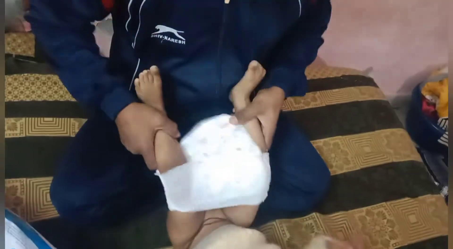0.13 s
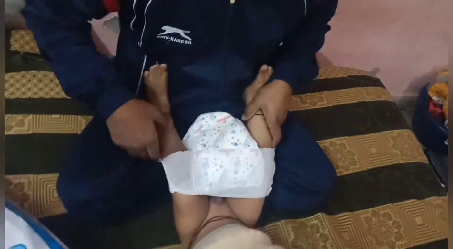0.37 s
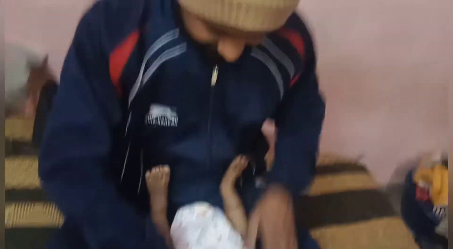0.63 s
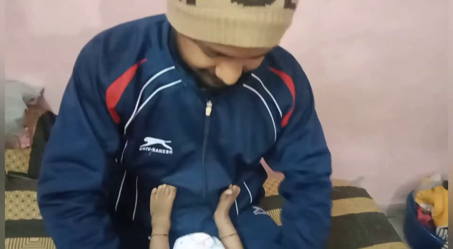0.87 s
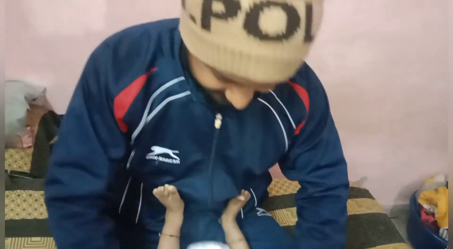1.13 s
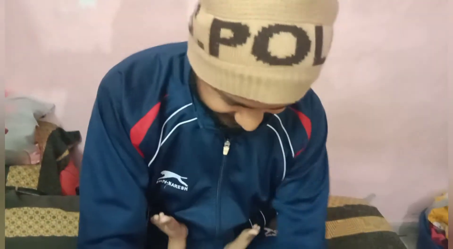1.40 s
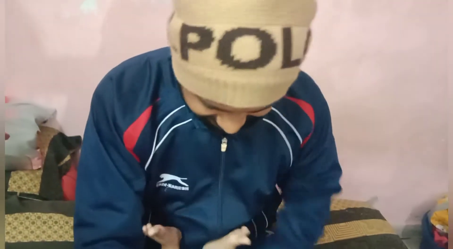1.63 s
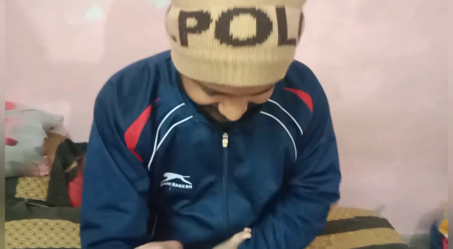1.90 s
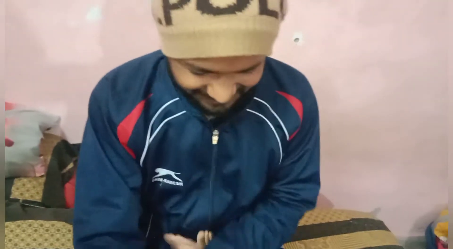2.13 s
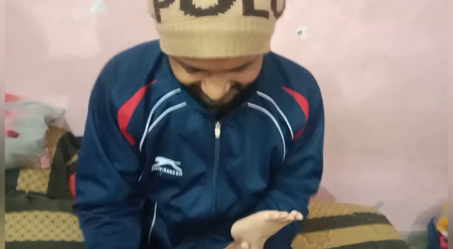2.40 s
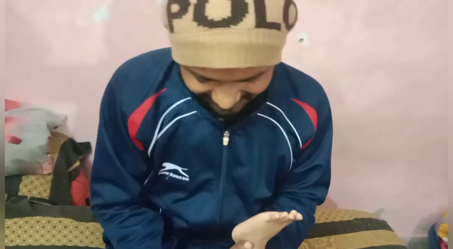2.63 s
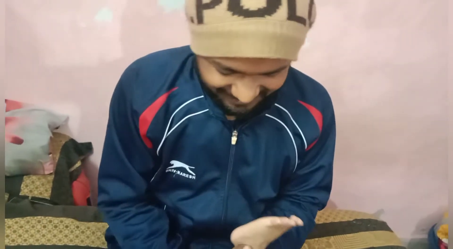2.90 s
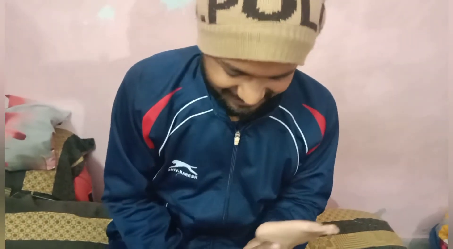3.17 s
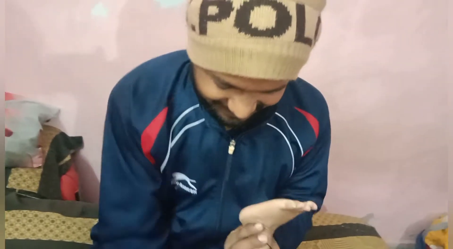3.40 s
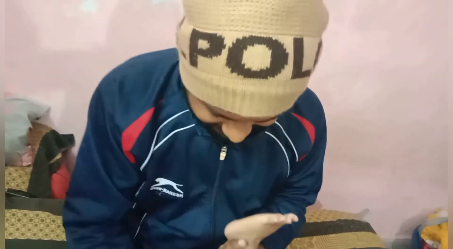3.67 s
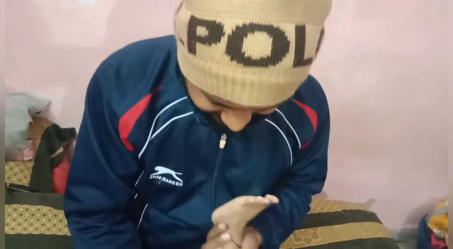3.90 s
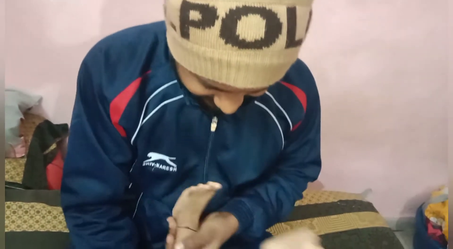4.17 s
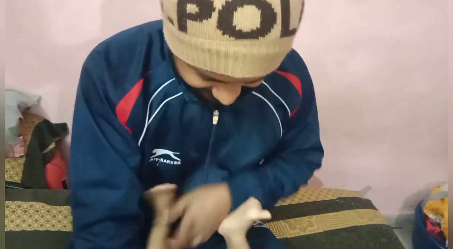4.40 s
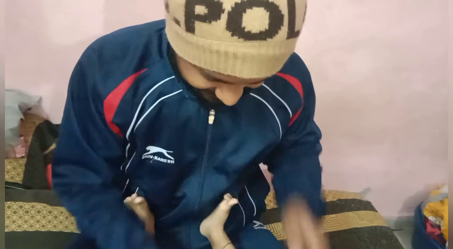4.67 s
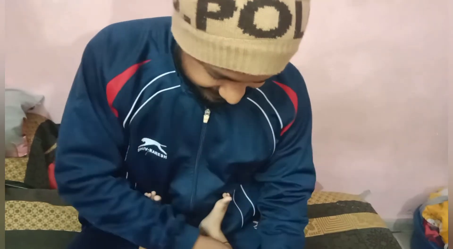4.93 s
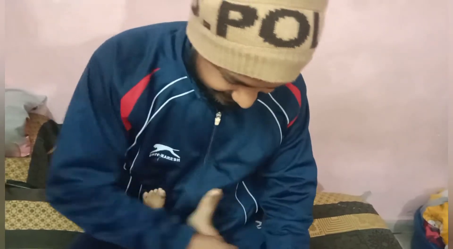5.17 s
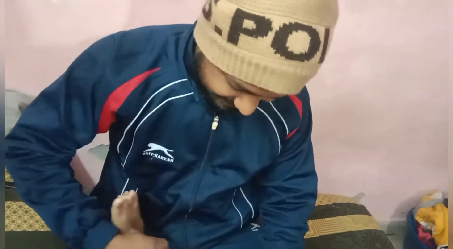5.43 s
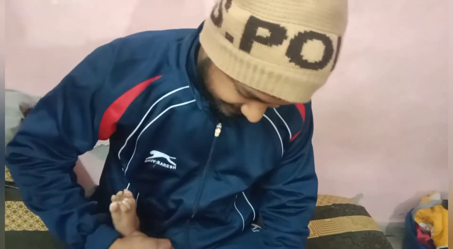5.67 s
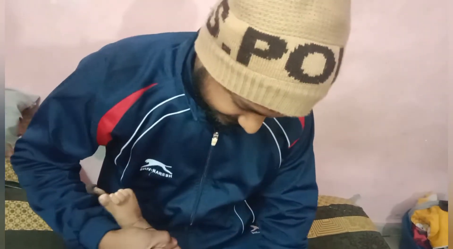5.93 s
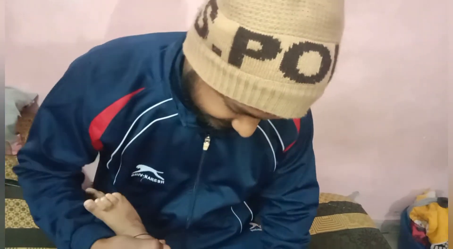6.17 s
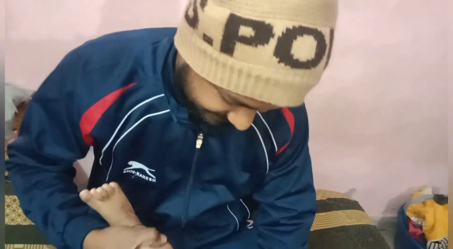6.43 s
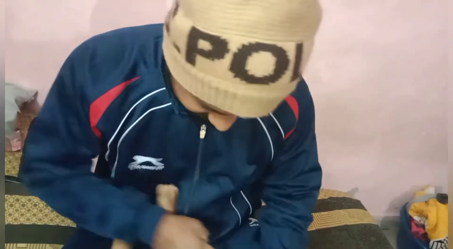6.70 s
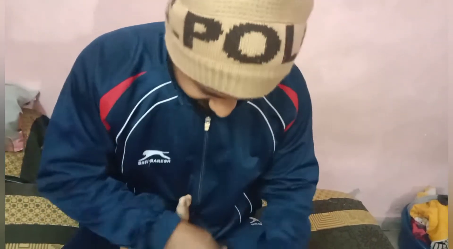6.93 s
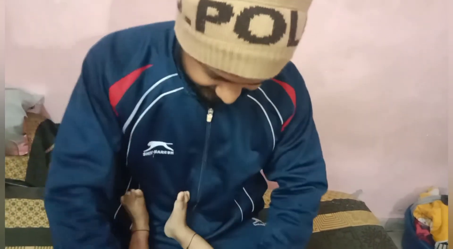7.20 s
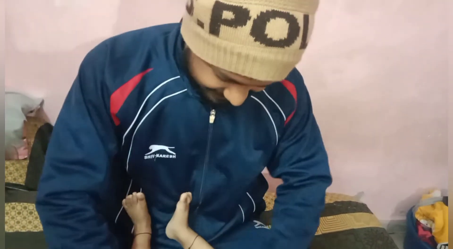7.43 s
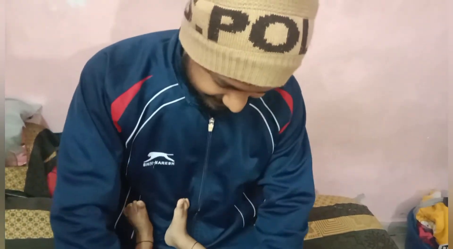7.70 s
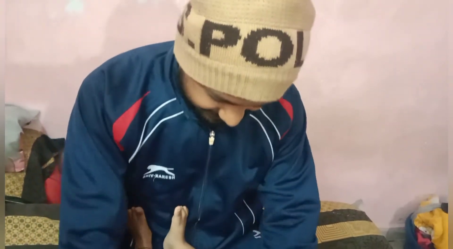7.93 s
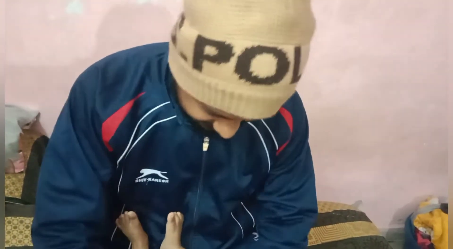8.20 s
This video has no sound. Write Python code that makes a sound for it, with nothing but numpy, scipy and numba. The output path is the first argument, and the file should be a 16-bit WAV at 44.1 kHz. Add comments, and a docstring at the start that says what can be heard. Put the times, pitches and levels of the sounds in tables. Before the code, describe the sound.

A small close microphone in a quiet room hears a disposable diaper being worked over a baby's legs on a bed. At 0 s there is a soft low bump with a very short scrape, then light crinkles. From about 0.47 to 0.9 s comes the biggest tug, a bright fibrous hiss with plastic crackle and muffled padding underneath. Sharp creases click near 1 s. Smaller rustles follow, with a crisp rub around 1.75 s and a longer one from 2.05 to 2.45 s, ending with a snap and dull bump. Clustered snaps come at 3.26 s and the sharpest at 3.45 s. Soft mattress nudges occur near 3.85 and 6.5 s. From 4 s onward only sparse, faint crinkles and ticks remain, slightly busier around 5.8 and 7.2 to 7.7 s, fading into low room hush by 8.3 s.

```python
"""Disposable diaper pulled on over a bed

A disposable diaper is pulled over a baby's legs on a bed, close to a small microphone in a quiet room.
Trains of tiny stick-slip clicks, shaped by tugs, make the fibres hiss and the plastic backsheet crinkle;
through moving resonances they make the padded core and the bedding rustle lower down. Creases snap as
bursts of clicks, hands and heels bump the mattress as damped low swings, and a short echo and a hush
of coloured noise make the room."""
import sys
import numpy as np
from scipy import signal
from scipy.fft import rfft, irfft
from scipy.io import wavfile
from scipy.ndimage import uniform_filter1d
from numba import njit

SR = 44100
rng = np.random.default_rng(int(sys.argv[2]) if len(sys.argv) > 2 else 0)


def wrap_up_sound(samples):
    """Save the sound to the file named by the first command line argument, as 16-bit audio."""
    columns = np.atleast_2d(samples).T
    # keep every value between -1 and 1, then stretch to whole-number steps
    tamed = np.clip(columns, -1, 1)
    steps = np.round(tamed * 32767).astype(np.int16)
    wavfile.write(sys.argv[1], SR, steps)


def gain_from_db(level_db):
    """Convert decibel levels to linear amplitude factors (20 dB per decade)."""
    decades = np.asarray(level_db, float) / 20
    return 10 ** decades


N = 367119

# Creases that snap: t/s, relative level/dB, share of the power given to the backsheet (0-1)
CREASE_SNAPS = [(0.1358, -29.5, 0.95), (0.147, -33, 0.95), (0.204, -26, 0.55), (0.317, -34.5, 0.9),
                (0.468, -27, 0.6), (0.934, -25, 0), (0.948, -28, 0.2), (0.9842, -21, 0.1),
                (0.998, -27, 0.05), (1.7277, -27, 0.04), (2.3556, -20.5, 0.7), (2.437, -35, 0.3),
                (3.16, -27, 0), (3.2582, -21, 0.8), (3.2627, -21.5, 0.6), (3.281, -22, 0.26),
                (3.4502, -18, 0.4), (4.5933, -32, 0.1), (4.62, -33, 0.4), (5.815, -29.5, 0.24),
                (5.883, -35, 0.8), (6.0599, -32.5, 0.1), (6.166, -37, 0.07), (6.418, -28.5, 0.2),
                (6.5376, -35, 0.7), (6.877, -30.5, 0.7), (6.9585, -36, 0.36), (7.181, -30, 0.75),
                (7.349, -29, 0.9), (7.4834, -32, 0.3), (7.6239, -29.5, 0.6), (7.647, -31, 0.6),
                (7.6666, -29, 0.1), (7.9614, -34, 0.04)]
# Bumps on the mattress: t/s, relative level/dB, f/Hz, time to fall 60 dB/s
MATTRESS_BUMPS = [(0.0, -29.5, 168, 0.075), (0.004, -49, 45, 0.25), (0.019, -33, 141, 0.11),
                  (2.355, -44, 310, 0.061), (2.375, -45, 307, 0.075), (2.435, -30, 87, 0.041),
                  (3.45, -56, 357, 0.069), (3.47, -57, 85, 0.12), (3.491, -39, 161, 0.059),
                  (3.841, -51, 118, 0.068), (3.85, -61, 85, 0.1), (3.856, -41.5, 167, 0.073),
                  (3.954, -46.5, 180, 0.075), (6.475, -52, 393, 0.089), (6.535, -41.5, 302, 0.039),
                  (6.557, -47.5, 171, 0.061), (6.56, -60, 85, 0.12)]
# Tugs and slides of the sheet: start t/s, length/s, hiss level at start/dB, hiss level at end/dB,
# finest fibres re hiss/dB, backsheet re hiss/dB
SHEET_TUGS = [(0.0, 0.025, -31.5, -45.5, -19, -5.5), (0.028, 0.086, -56.5, -52.5, -15, -4),
              (0.139, 0.065, -55, -45, -10.5, -11), (0.225, .05, -54, -56, -12, -9),
              (0.318, 0.057, -54, -57.5, -15, -7), (0.471, 0.061, -41.5, -31, -2, -2.5),
              (0.55, .17, -32, -35.5, -1.5, -2), (0.736, 0.15, -41, -45.5, 1, -0.3),
              (0.911, .16, -44.5, -46.5, -5.5, -5), (1.086, 0.055, -53.5, -58.5, -6, -8),
              (1.179, 0.044, -55, -55, -7, -11), (1.216, 0.15, -45.5, -48.5, -7.5, -7.5),
              (1.383, 0.076, -58, -59, -11, -11), (1.53, 0.12, -56, -59.5, -6, -10.5),
              (1.743, 0.038, -37.5, -37, -4, -12), (1.805, 0.069, -45, -37, -4.5, -9.5),
              (1.945, 0.072, -59, -51, -21, -5), (2.01, 0.025, -57, -52, -9, -1.5),
              (2.052, .24, -46, -45, -5, -4.5), (2.302, 0.074, -45.5, -41, -5, -5),
              (2.413, .12, -44, -51.5, -8.5, -5), (2.595, 0.059, -54.5, -54, -11, -6.5),
              (2.803, 0.076, -62, -64, -11, -18), (2.956, 0.051, -54, -61, -18, -11),
              (3.028, 0.095, -61, -52.5, -9, -9), (3.145, 0.086, -50, -49, -6, -5),
              (3.256, 0.083, -42.5, -51.5, -3.5, -4.5), (3.381, 0.061, -50.5, -37, -7.5, -2),
              (3.532, 0.16, -55.5, -52, -6.5, -5), (3.727, 0.14, -55, -61.5, -7.5, -6),
              (3.856, 0.13, -58, -53, -5, -7), (3.972, 0.23, -56.5, -58, -5.5, -8.5),
              (4.217, 0.25, -58.5, -47, -7.5, -7), (4.485, 0.064, -53, -56, -12, -9),
              (4.571, 0.054, -60.5, -55, -8, -6), (4.843, 0.074, -54, -61, -10, -9.5),
              (4.957, .09, -56, -61, -13, -9), (5.056, 0.033, -56.5, -48, -6, -5.5),
              (5.196, 0.058, -66, -55, -9, -3.5), (5.29, .2, -52, -60.5, -5.5, -7.5),
              (5.717, .05, -65.5, -61, -8, -11), (5.788, 0.058, -55, -46, -3, -9),
              (5.868, 0.12, -48, -60.5, -7, -6.5), (6.021, 0.096, -54, -62.5, -6.5, -7.5),
              (6.153, .03, -55, -58.5, -9, -13), (6.198, 0.11, -61.5, -53, -6, -6),
              (6.341, 0.092, -59.5, -47.5, -7, -7.5), (6.448, 0.064, -51.5, -57, -5, -8),
              (6.534, 0.048, -51.5, -55, -6, -5.5), (6.752, 0.13, -58, -51, -7, -6),
              (6.959, 0.02, -59, -61, -16, -7), (7.154, 0.012, -62, -51.5, -1.5, -3),
              (7.185, .03, -55, -59, -6, -4), (7.256, 0.22, -50.5, -52.5, -4, -6),
              (7.499, .08, -54.5, -59.5, -5, -5.5), (7.602, 0.078, -54, -47.5, -4, -7),
              (7.963, 0.027, -59, -61.5, -11, -10), (8.096, .15, -76.5, -66.5, -1.5, -10.5),
              (8.304, .05, -63.5, -56, -3, -4)]
# Squeezes of the padded core, a hollow whose size changes: start t/s, length/s, level/dB, hollow f/Hz
CORE_SQUEEZES = [(0.0, .03, -47, 1240), (0.16, .01, -56, 1540), (0.21, 0.0085, -59, 1327),
                 (0.32, 0.004, -58, 1400), (0.51, .22, -45, 1370), (0.78, 0.19, -55, 1230),
                 (0.95, 0.085, -50.5, 1155), (1.25, .11, -58, 1190), (1.74, .06, -61, 1250),
                 (1.85, 0.084, -68, 1170), (2.08, 0.076, -54.5, 1370), (2.2, 0.14, -60, 1450),
                 (2.36, 0.038, -55.5, 1280), (2.44, 0.18, -66.5, 1400), (2.97, 0.0068, -63, 1360),
                 (3.2, 0.022, -59, 1000), (3.26, 0.033, -53, 1130), (3.4, 0.071, -54.5, 1350),
                 (3.66, 0.011, -61, 972), (3.84, 0.0082, -62.5, 1220), (3.98, 0.0073, -64, 1110),
                 (4.17, .01, -66.5, 1440), (4.35, 0.024, -67, 1290), (4.47, 0.013, -72, 1190),
                 (4.96, 0.012, -60, 1314), (5.08, 0.0077, -63.5, 1100), (5.86, 0.067, -59, 1230),
                 (6.44, 0.0064, -64, 1360), (6.56, 0.0053, -64, 1160), (6.82, .08, -67, 1205),
                 (6.96, 0.029, -65, 1320), (7.18, 0.0091, -61, 1060), (7.28, 0.039, -61, 1160),
                 (7.37, 0.13, -61, 1230), (7.67, 0.015, -63, 1180), (7.97, 0.011, -70.5, 1240)]
# The body shifts on the bedding: start t/s, length/s, level/dB, strongest f/Hz
BED_SHIFTS = [(0.0, 0.01, -39.5, 167), (0.06, .07, -58.5, 160), (0.16, 0.04, -63.5, 347),
              (0.51, 0.18, -46.5, 413), (0.7, 0.14, -52.5, 313), (0.86, 0.12, -55.5, 290),
              (1.0, 0.0047, -51.5, 362), (1.04, 0.051, -60, 348), (1.27, 0.0081, -62.5, 159),
              (1.37, 0.016, -69, 388), (1.55, 0.0092, -71, 164), (1.78, 0.0033, -69, 397),
              (2.15, 0.0092, -63.5, 323), (2.22, 0.078, -58.5, 610), (2.36, 0.016, -52, 277),
              (2.43, 0.021, -55.5, 143), (2.5, 0.013, -67, 413), (3.28, 0.017, -69, 410),
              (3.45, 0.017, -50, 360), (3.5, 0.016, -63.5, 276), (3.57, .04, -71, 150),
              (3.66, 0.088, -72, 430), (3.84, 0.024, -55, 176), (3.98, 0.0061, -63, 163),
              (4.96, 0.094, -73, 330), (5.4, 0.0073, -67, 317), (5.86, .01, -70, 384),
              (6.02, 0.0087, -64.5, 402), (6.14, .01, -71, 545), (6.3, 0.008, -69.5, 517),
              (6.49, .02, -68.5, 410), (6.58, 0.005, -69.5, 212), (6.84, .01, -73, 159),
              (7.02, .01, -74, 306), (7.3, .1, -64.5, 408), (7.67, 0.0066, -71, 337), (8.0, .01, -71, 316),
              (8.2, .1, -76, 290)]

# Colour of the sliding fibres through the small microphone port: f/Hz, relative level per Hz/dB
FIBRE_COLOUR = [(3500, -38), (4250, -13.5), (4650, -2.5), (5200, 0.5), (5700, 1.5), (6500, -2), (7200, -15),
                (8200, -31), (10300, -34.5), (11500, -56.5)]
# Colour of the finest fibres, the top of the hiss: f/Hz, relative level per Hz/dB
FINEST_COLOUR = [(7000, -51), (8300, -31), (10500, -18.5), (12000, -19.5), (13300, -15.5), (13900, -10.5),
                 (14300, -9.5), (14800, 7.5), (15300, 3), (15750, 3.5), (17000, -10.5)]
# Colour of the tight plastic backsheet: f/Hz, relative level per Hz/dB
BACKSHEET_COLOUR = [(1800, -35.5), (2600, -7.5), (2900, 1), (3250, 3), (3800, -0.5), (4300, -5.5),
                    (5000, -39.5)]
# Colour of the slack, lower-sounding backsheet: f/Hz, relative level per Hz/dB
SLACK_COLOUR = [(1200, -26.5), (1650, -9), (1950, -3.5), (2250, -1.5), (2600, 1.5), (3000, -11.5),
                (4000, -43.5)]
# Colour of the padded core: f/Hz, relative level per Hz/dB
CORE_COLOUR = [(600, -34), (800, -9.5), (950, 4), (1250, -5.5), (1500, 1.5), (1900, 0.5), (3000, -58.5)]
# Colour of the bedding: f/Hz, relative level per Hz/dB
BEDDING_COLOUR = [(40, -50), (70, -10), (130, 1), (300, 1), (450, -2), (700, -3.5), (1000, 13.5),
                  (2000, -71)]
# Colour of the quiet room: f/Hz, relative level per Hz/dB
HUSH_COLOUR = [(20, -20), (60, -3.5), (150, 0), (330, -5), (550, -14.5), (900, -13), (1400, -9),
               (2100, -14.5), (3300, -26), (4200, -35), (5000, -8), (6200, 0), (7400, -27), (11500, -44),
               (13800, -50), (14800, -16), (16000, -26)]

# How fast strokes swell and fade, and the level between them
TUG_RISE_DB_PER_S, TUG_FALL_DB_PER_S, TUG_REST_DB = 620, 255.5, -75.5
SQUEEZE_RISE_DB_PER_S, SQUEEZE_FALL_DB_PER_S, CORE_REST_DB = 498.5, 266, -85
SHIFT_RISE_DB_PER_S, SHIFT_FALL_DB_PER_S, BED_REST_DB = 598, 242, -80.5
CORE_FOLLOWS_DB, BED_FOLLOWS_DB = -21, -31  # every tug also stirs core and bedding, re hiss
HUSH_DB, ECHO_DB, ECHO_T60_S = -73.5, -15, 0.16  # the echo level is relative to the near sound
DIP_S, DIP_END_S, DIP_DB = 7.08, 7.157, -7


def rms_one(x):
    """Scale to unit rms."""
    return x / np.sqrt(np.mean(x ** 2) + 1e-20)


def coloured(x, spectrum, size=4096):
    """Causal filter with the given spectrum (minimum phase, from the folded cepstrum), unit energy."""
    hz, db = np.transpose(spectrum)
    grid = np.maximum(np.arange(size // 2 + 1), 1) * SR / size
    cepstrum = irfft(np.log(gain_from_db(np.interp(np.log(grid), np.log(hz), db))))
    cepstrum[1:size // 2] *= 2
    cepstrum[size // 2 + 1:] = 0
    response = irfft(np.exp(rfft(cepstrum)))
    return signal.fftconvolve(x, response / np.sqrt(np.sum(response ** 2)))[:N]


def drift(rate):
    """Slow random wander of unit rms, changing about rate times a second."""
    r = np.exp(-2 * np.pi * rate / SR)
    noise = rng.standard_normal(N + SR)
    settled = signal.lfilter([1], [1, -2 * r, r * r], noise)[SR:]
    return rms_one(settled)


def patchy(x, patch_db, patch_hz, patch_s, even_db=-58.0):
    """Slow random gain over time and pitch; the patches even out as a frame grows louder than even_db."""
    hz, s, frames = signal.stft(x, SR, nperseg=1024, noverlap=768)
    field = rng.standard_normal(frames.shape)
    for _ in range(2):
        field = uniform_filter1d(field, size=max(1, round(patch_hz / hz[1])), axis=0)
        field = uniform_filter1d(field, size=max(1, round(patch_s / s[1])), axis=1)
    loud = np.sqrt(np.sum(np.abs(frames) ** 2, axis=0))
    gain = gain_from_db(patch_db * rms_one(field) / np.sqrt(1 + loud / gain_from_db(even_db)))
    gain /= np.sqrt(np.mean(gain ** 2, axis=0))
    return signal.istft(frames * gain, SR, nperseg=1024, noverlap=768)[1][:N]


def stick_slip(clump_db):
    """Tiny releases of rubbing material: random clicks of uneven size, clumped by clump_db; rms 1."""
    sizes = gain_from_db(2.5 * np.minimum(rng.exponential(1, N), 5)) * rng.choice([-1, 1], N)
    born = rng.random(N) < 5000.0 / SR  # about 5000 slips a second
    return rms_one(sizes * born * gain_from_db(clump_db * drift(45.0)))


def slips(shared, share):
    """Part of the slips is common to all layers, the rest belongs to one layer."""
    own = stick_slip(clump_db=0.83)
    return np.sqrt(share) * shared + np.sqrt(1 - share) * own


def strokes(start, length, first_db, last_db, rise, fall, rest_db):
    """Level in dB of overlapping strokes: each rises, drifts from first_db to last_db, falls; powers add."""
    t = np.arange(0, N + 32, 32) / SR
    since, length = t - start[:, None], length[:, None]
    held = first_db[:, None] + (last_db - first_db)[:, None] * np.clip(since / length, 0, 1)
    db = held + rise * np.minimum(since, 0) - fall * np.maximum(since - length, 0)
    power = np.sum(gain_from_db(2 * db), axis=0) + gain_from_db(2 * rest_db)
    return np.interp(np.arange(N) / SR, t, 10 * np.log10(power))


def tug_level(re_hiss_db):
    """Level in dB of one layer under the tugs, set against the fibre hiss."""
    start, length, first, last = np.transpose(SHEET_TUGS)[:4]
    rest = TUG_REST_DB + np.mean(re_hiss_db)
    return strokes(start, length, first + re_hiss_db, last + re_hiss_db,
                   TUG_RISE_DB_PER_S, TUG_FALL_DB_PER_S, rest)


def pitched_strokes(rows, rise, fall, rest_db, stirred_db):
    """Level of steady strokes over a stirred background, and a pitch gliding between stroke middles."""
    start, length, db, hz = np.transpose(rows)
    level = strokes(start, length, db, db, rise, fall, rest_db)
    total = 10 * np.log10(gain_from_db(2 * level) + gain_from_db(2 * stirred_db))
    return total, np.interp(np.arange(N) / SR, start + length / 2, hz)


@njit
def gliding_resonance(x, w, r):
    """Two-pole resonance with moving centre w (radians per sample) and pole radius r, at even power."""
    y = np.zeros(len(x))
    for i in range(2, len(x)):
        drive = np.sqrt(1 - r[i] ** 2) * (x[i] - x[i - 2])
        y[i] = drive + 2 * r[i] * np.cos(w[i]) * y[i - 1] - r[i] ** 2 * y[i - 2]
    return y


def hollow(x, level_db, hz, colour, sharpness):
    """Rubbing heard through a moving resonance, with a broad part beside it."""
    radius = np.exp(-np.pi * hz / sharpness / SR)
    ringing = rms_one(gliding_resonance(x, 2 * np.pi * hz / SR, radius))
    broad = gain_from_db(-7.0) * coloured(x, colour)
    return gain_from_db(level_db) * rms_one(ringing + broad)


def room_hush():
    """Coloured noise of a quiet room, wandering slowly in level and patchy in pitch."""
    level = gain_from_db(HUSH_DB + 1.8 * drift(2.4))
    hush = level * coloured(rng.standard_normal(N), HUSH_COLOUR)
    return patchy(hush, patch_db=4.0, patch_hz=200.0, patch_s=0.04)


def room_echo(x):
    """Walls return a short, dull, decaying wash."""
    t = np.arange(SR // 2) / SR
    tail = rng.standard_normal(len(t)) * gain_from_db(-60 * t / ECHO_T60_S) * (t > 0.006)
    tail = signal.lfilter([1], [1, -0.3], tail)
    return signal.fftconvolve(x, tail / np.sqrt(np.sum(tail ** 2)))[:N]


def mattress_bumps():
    """A soft push: a damped low swing that swells over a few milliseconds."""
    out, t = np.zeros(N), np.arange(SR // 2) / SR
    for s, db, hz, t60 in MATTRESS_BUMPS:
        i = round(s * SR)
        swing = (1 - np.exp(-t / 0.0054)) * gain_from_db(db + 1.0 - 60 * t / t60)
        out[i:i + len(t)] += swing * np.sin(2 * np.pi * hz * t)
    return out


def bedding_rustle(shared, hiss_db):
    """The body rubs the bedding: slips through a low, blunt, gliding resonance."""
    level, hz = pitched_strokes(BED_SHIFTS, SHIFT_RISE_DB_PER_S, SHIFT_FALL_DB_PER_S, BED_REST_DB,
                                hiss_db + BED_FOLLOWS_DB)
    return hollow(slips(shared, 0.26), level, hz, BEDDING_COLOUR, sharpness=1.95)


def core_rustle(shared, hiss_db):
    """The squeezed padding is a hollow of changing size: slips through a sharper gliding resonance."""
    level, hz = pitched_strokes(CORE_SQUEEZES, SQUEEZE_RISE_DB_PER_S, SQUEEZE_FALL_DB_PER_S, CORE_REST_DB,
                                hiss_db + CORE_FOLLOWS_DB)
    return hollow(slips(shared, 0.29), level, hz, CORE_COLOUR, sharpness=7.0)


def crease_snaps():
    """A crease gives way in one sharp click; smaller ones run along it for some milliseconds."""
    s, db, share = np.transpose(CREASE_SNAPS)
    lag = 0.012 * rng.random((len(s), 6)) ** 2
    lag[:, 0] = 0  # the main click
    sign = rng.choice([-1, 1], lag.shape)
    weaker_db = np.where(lag > 0, 9.5 + 900 * lag, 0)
    size = gain_from_db(db[:, None] + 3.0 - weaker_db) * sign
    at = np.round((s[:, None] + lag) * SR).astype(int)
    bright, body = np.zeros(N), np.zeros(N)
    np.add.at(bright, at, size * np.sqrt(1 - share[:, None]))
    np.add.at(body, at, size * np.sqrt(share[:, None]))
    fibres = coloured(bright, FIBRE_COLOUR) + gain_from_db(-14.5) * coloured(bright, FINEST_COLOUR)
    sheet = coloured(body, BACKSHEET_COLOUR) + gain_from_db(-4.5) * coloured(body, SLACK_COLOUR)
    return fibres + sheet + gain_from_db(-10) * coloured(body, CORE_COLOUR)


def backsheet_crinkle(shared, hiss_db):
    """Slips ring the tight plastic sheet; harder pulls shake more of the slack, lower-sounding sheet."""
    tight_re_hiss = np.transpose(SHEET_TUGS)[5]
    sheet = gain_from_db(tug_level(tight_re_hiss)) * slips(shared, 0.48)
    slack_db = -5 + 0.1072 * (hiss_db + 52)  # re tight sheet; -5 dB at a hiss of -52 dB
    return coloured(sheet, BACKSHEET_COLOUR) + coloured(gain_from_db(slack_db) * sheet, SLACK_COLOUR)


def fibre_hiss(shared, hiss_db):
    """Sliding fibres release in tiny slips, the finest of them ringing highest."""
    finest_re_hiss = np.transpose(SHEET_TUGS)[4]
    fibres = coloured(gain_from_db(hiss_db) * slips(shared, 0.41), FIBRE_COLOUR)
    finest = gain_from_db(tug_level(finest_re_hiss)) * slips(shared, 0.37)
    return fibres + coloured(finest, FINEST_COLOUR)


def diaper():
    """One train of slips shakes every layer; slow random gain makes the rustle patchy in time and pitch."""
    shared = stick_slip(clump_db=0.0)
    hiss_db = tug_level(0)
    lower = bedding_rustle(shared, hiss_db) + core_rustle(shared, hiss_db)
    lower += backsheet_crinkle(shared, hiss_db)
    fibres = fibre_hiss(shared, hiss_db)
    return (patchy(lower, patch_db=4.5, patch_hz=130.0, patch_s=0.03)
            + patchy(fibres, patch_db=2.0, patch_hz=300.0, patch_s=0.03))


def level_dip():
    """Gain of a brief dip: the level sinks over 40 ms, holds, and returns at once."""
    t = np.arange(N) / SR
    return gain_from_db(DIP_DB * np.clip((t - DIP_S) / 0.04, 0, 1) * (t < DIP_END_S))


def scene():
    """Diaper and bed with their echo, over the hush of the room."""
    near = mattress_bumps() + crease_snaps() + diaper()
    mix = room_hush() + gain_from_db(ECHO_DB) * room_echo(near) + near
    return (level_dip() * mix)[None]


def low_pass(x):
    """Removes everything above the highest recorded frequency."""
    return signal.sosfilt(signal.butter(12, 16580, fs=SR, output="sos"), x)


def record(dry):
    """The deepest bass is thinned below 45 Hz and the top is cut steeply above 15.8 kHz."""
    high_pass = signal.butter(2, 45.0, "high", fs=SR, output="sos")
    top_cut = signal.ellip(12, 0.5, 70, 15800, fs=SR, output="sos")
    mix = signal.sosfilt(top_cut, signal.sosfilt(high_pass, dry))
    return low_pass(mix)


dry = scene()
out = record(dry)
wrap_up_sound(out)
```